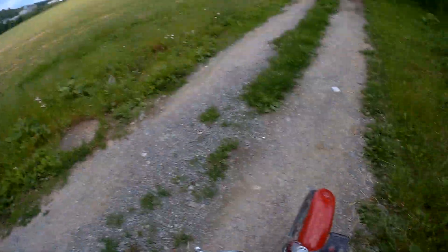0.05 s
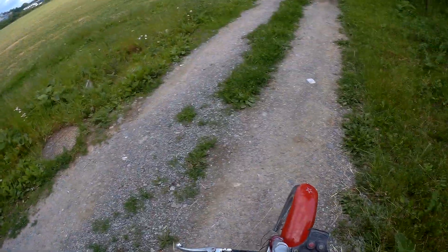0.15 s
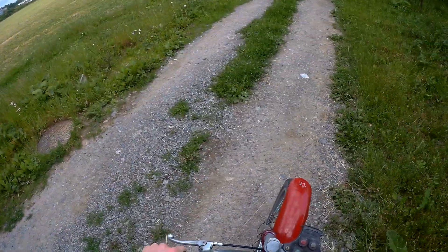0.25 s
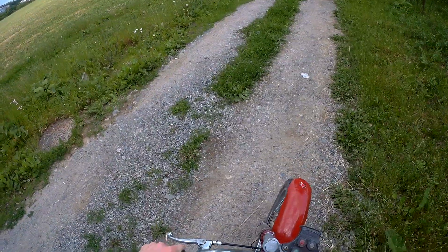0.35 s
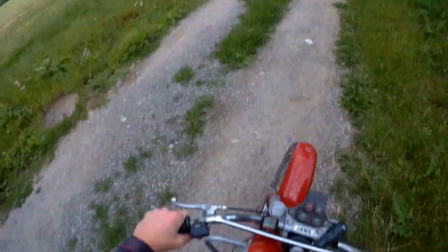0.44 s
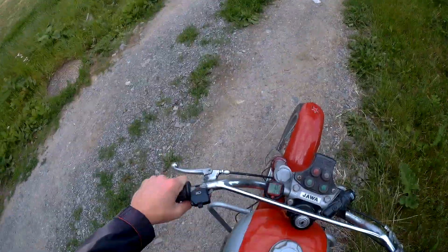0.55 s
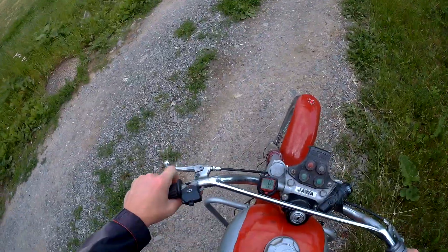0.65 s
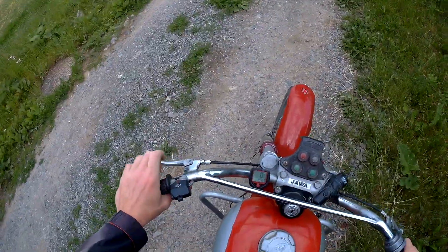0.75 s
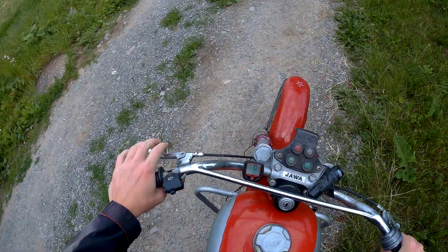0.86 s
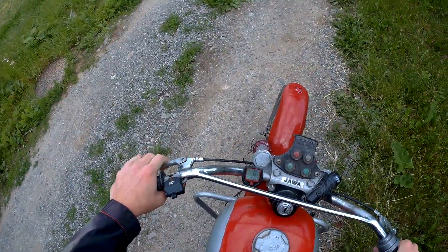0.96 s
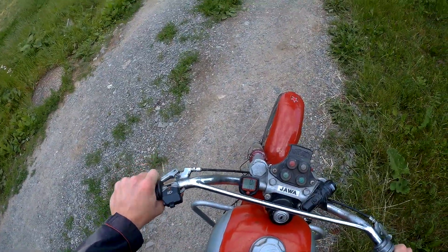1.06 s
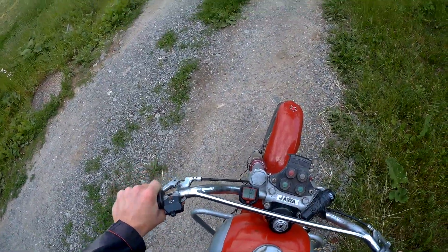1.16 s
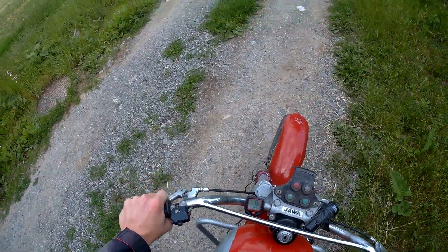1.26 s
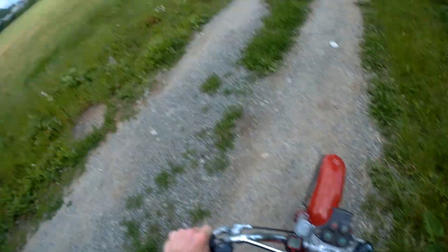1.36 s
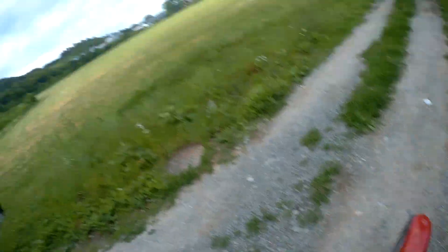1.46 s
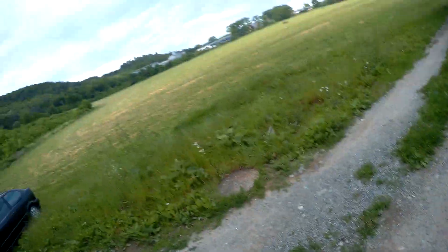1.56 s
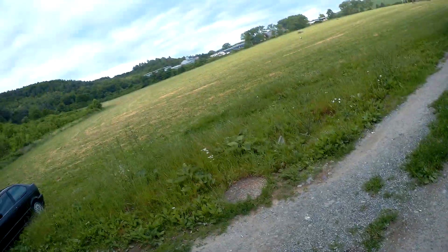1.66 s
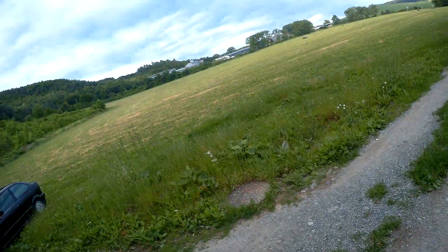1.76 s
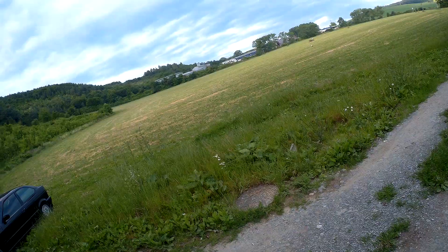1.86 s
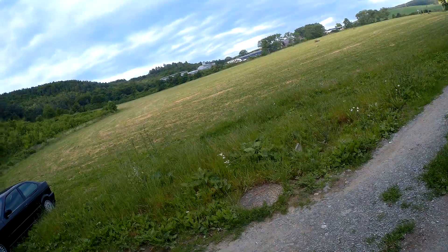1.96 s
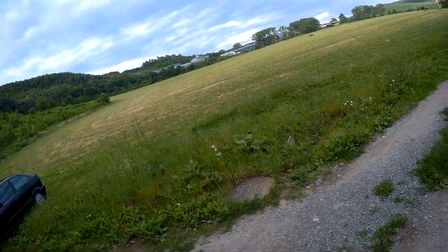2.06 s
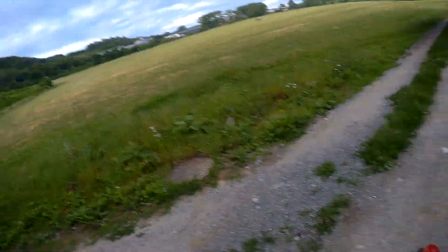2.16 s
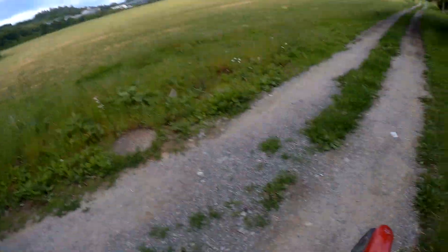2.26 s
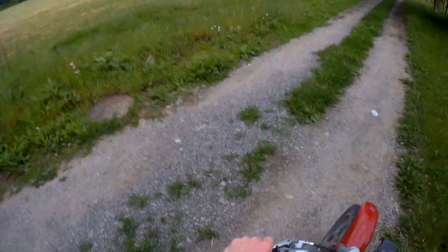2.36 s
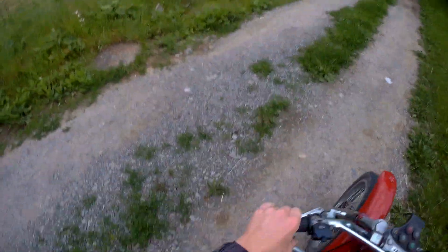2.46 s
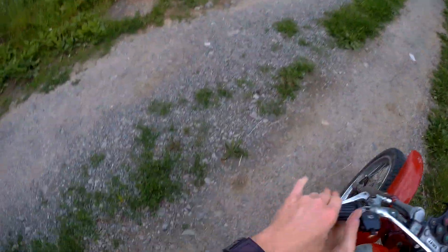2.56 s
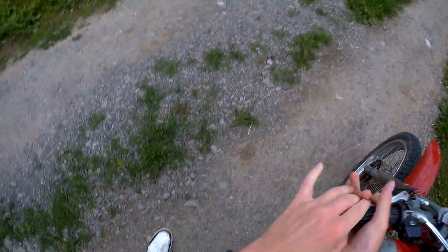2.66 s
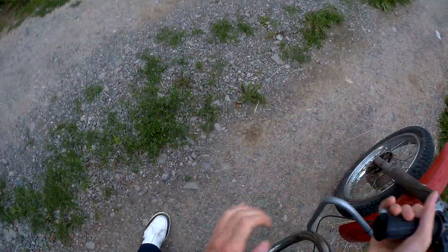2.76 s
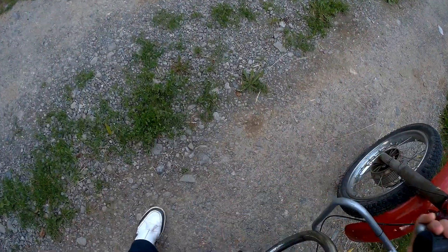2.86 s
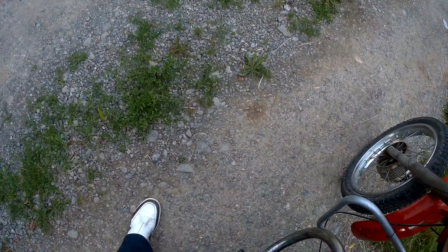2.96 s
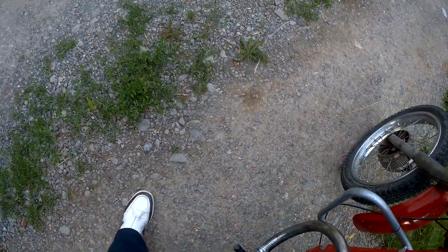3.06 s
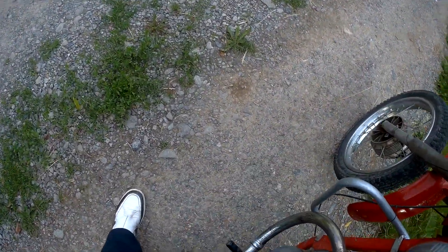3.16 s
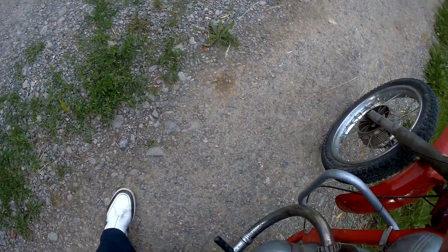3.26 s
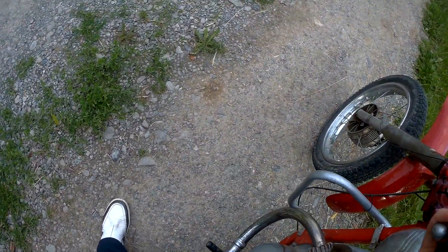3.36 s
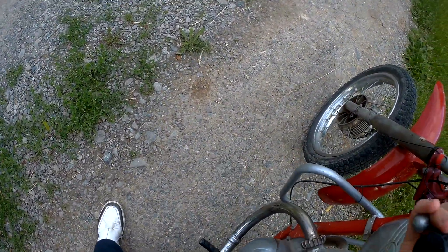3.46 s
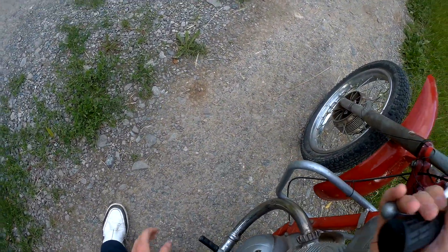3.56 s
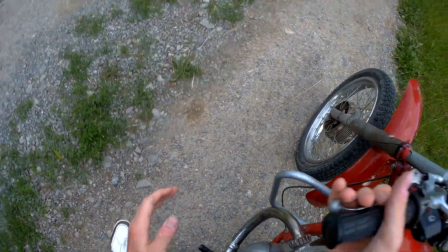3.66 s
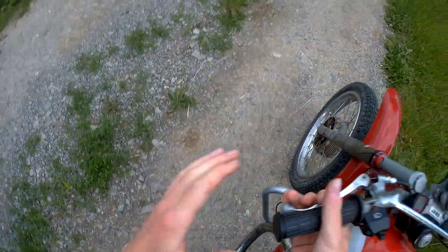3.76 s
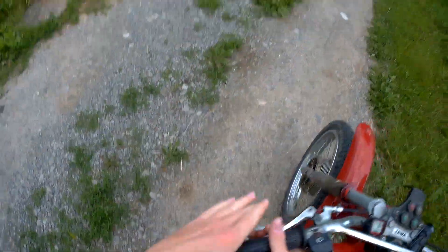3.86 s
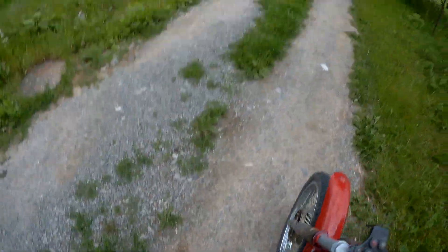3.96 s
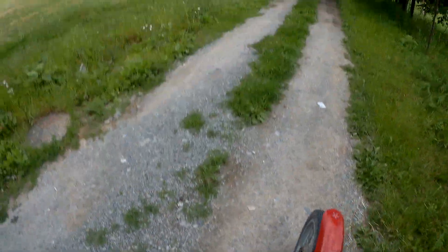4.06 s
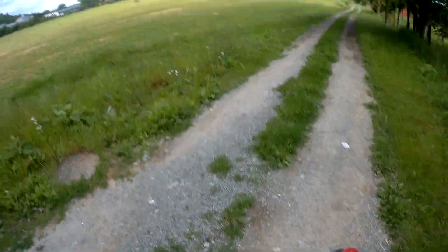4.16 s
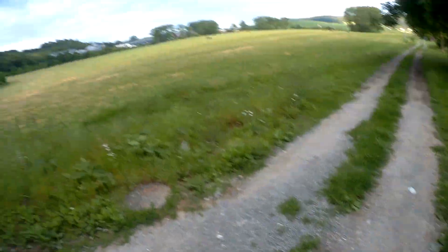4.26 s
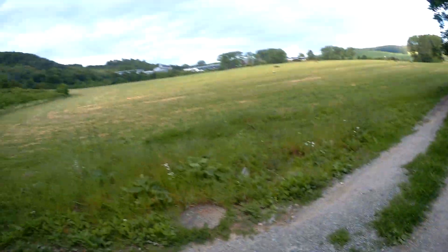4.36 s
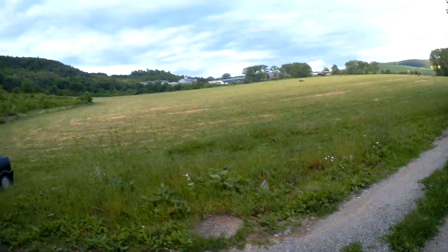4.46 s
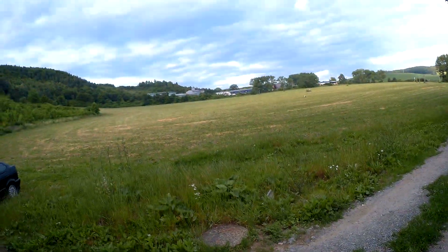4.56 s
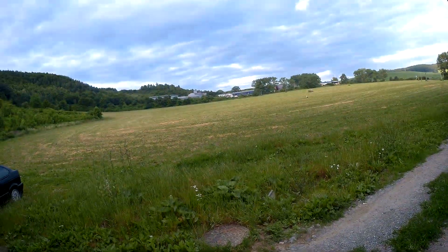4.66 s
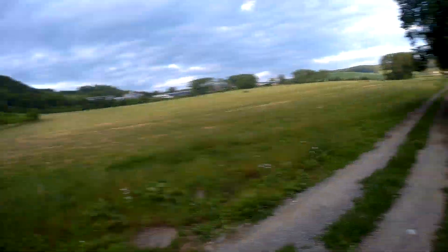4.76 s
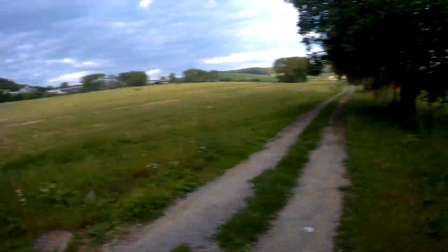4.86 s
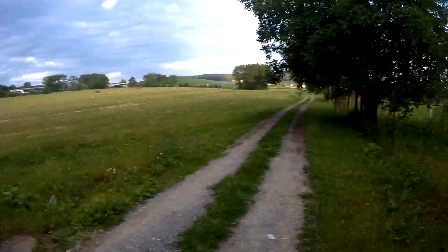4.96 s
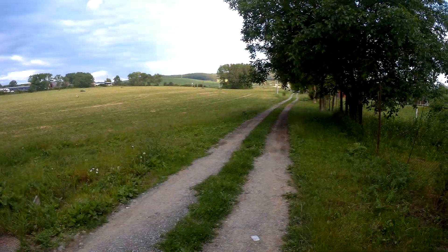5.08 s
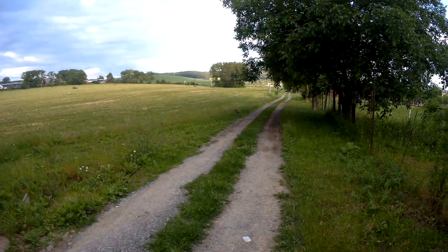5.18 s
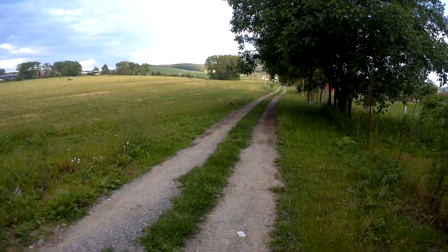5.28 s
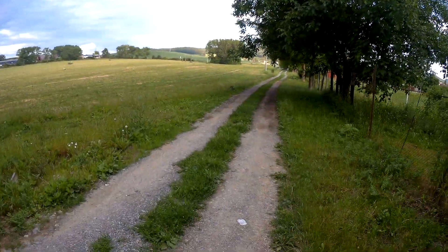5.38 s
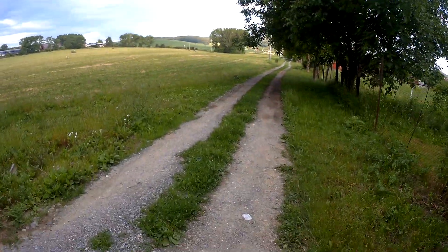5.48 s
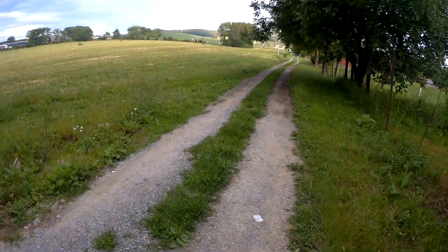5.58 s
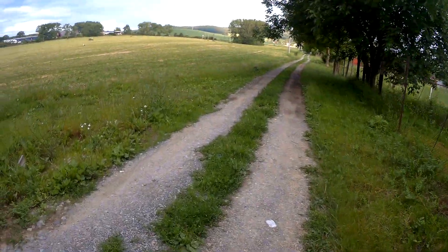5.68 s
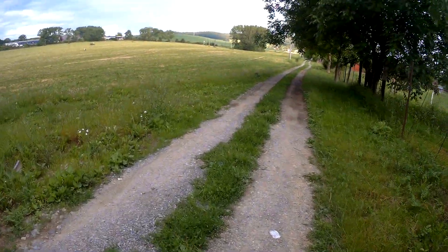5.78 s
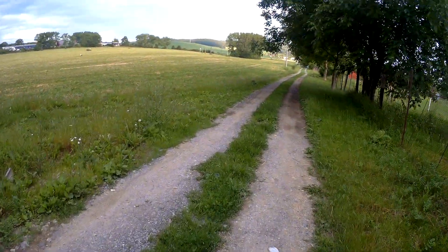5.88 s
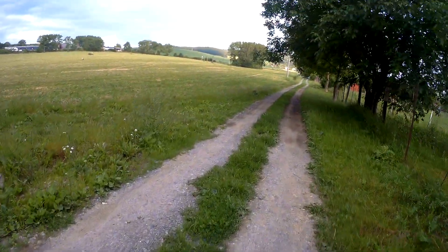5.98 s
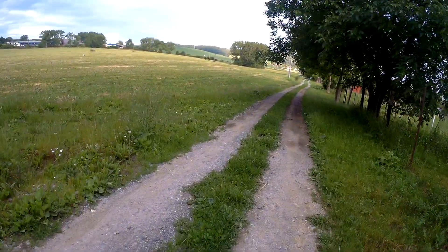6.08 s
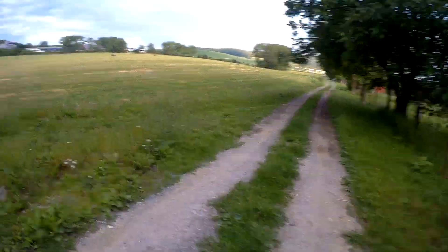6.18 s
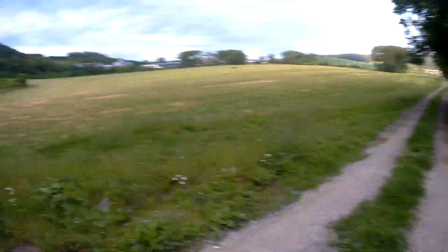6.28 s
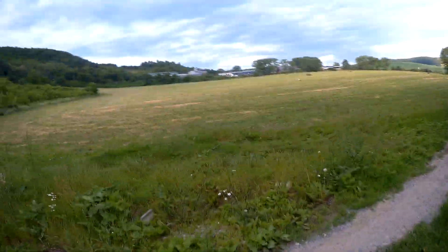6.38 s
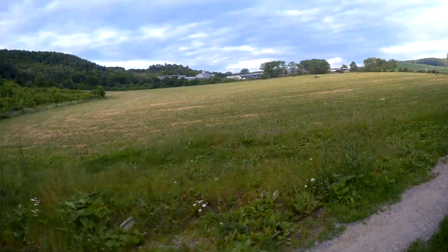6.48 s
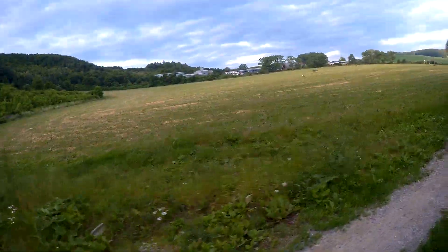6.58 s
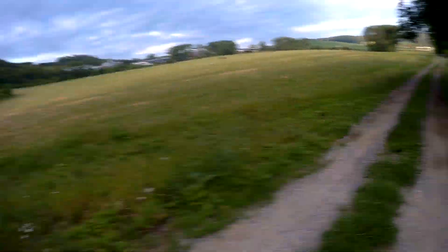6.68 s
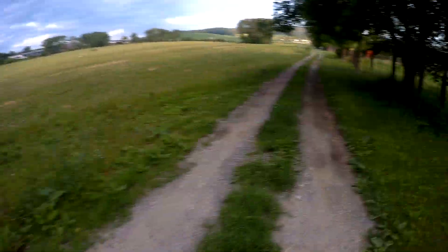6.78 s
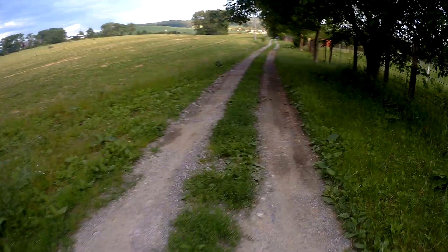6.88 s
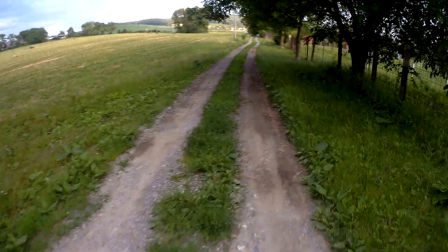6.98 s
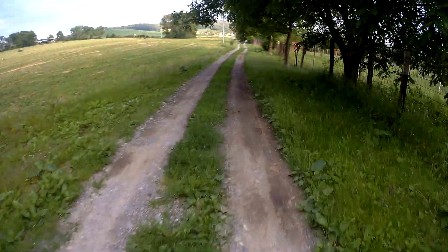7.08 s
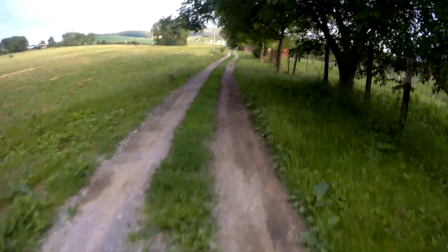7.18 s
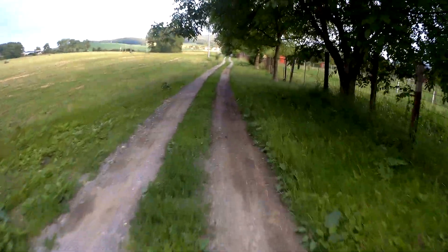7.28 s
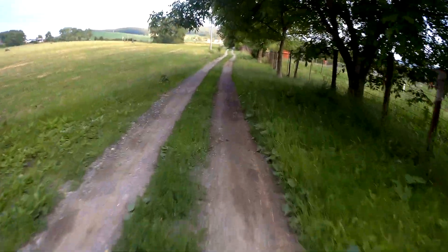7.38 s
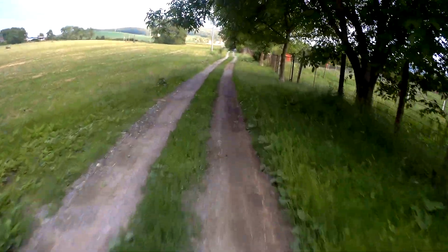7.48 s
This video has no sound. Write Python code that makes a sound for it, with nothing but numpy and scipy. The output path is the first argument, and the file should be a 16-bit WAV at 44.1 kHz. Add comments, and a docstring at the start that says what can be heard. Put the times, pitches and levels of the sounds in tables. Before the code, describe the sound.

Outdoors and very close, with the microphone at a rider's head. A single-cylinder two-stroke starts low and quiet at 0 s, with small pops, then is blipped from about 0.35 to 1 s: ragged intake gulps, case clanks and quickly rising revs. From 1 to 4.7 s it coasts with loose metallic clatter, gradually slowing but nudged up by lone firings, each a dry crack with ringing metal and a silencer thud, near 1.3, 1.55 (a quick cluster), 2.0, 2.4, 2.8, 3.2, 3.6, 3.95 and 4.3 s. Between 2.9 and 3.9 s the ticking is closer and brighter. At 4.75 s intake gasps burst out and the engine pulls away, climbing to a hard, ringing buzz by 5.5 s, firing unevenly, easing around 6 to 6.8 s, smoother and duller, then rising again, loud and harsh, to 7.5 s. Low gusty wind, handling rumble, soft bumps (strongest near 6.4 s) and steady hiss underneath.

```python
"""A single-cylinder two-stroke motorcycle engine, heard from the rider's head: blipped, coasting, pulling away.
One crank speed drives it all: pipe tones are crank orders, intake gulps and contacts are shaped noise and clicks.
Coasting, lone firings crack, thud and kick the crank; resonances ring as crankcase, fins and exhaust header.
Behind it lie gusty wind, handling rumble, soft bumps and hiss at the microphone."""
import sys
import numpy as np
from scipy import signal
from scipy.fft import rfft, irfft
from scipy.io import wavfile
from scipy.ndimage import uniform_filter1d

SR = 44100
rng = np.random.default_rng(int(sys.argv[2]) if len(sys.argv) > 2 else 0)


def persist_wave(psi):
    """Save psi, clipped to +-1, as 16-bit WAV."""
    counts = np.round(np.clip(psi, -1, 1) * 32767).astype(np.int16)
    wavfile.write(sys.argv[1], SR, np.atleast_2d(counts).T)


N = 332073
TIME_S = np.arange(N) / SR

# crank speed while blipped: time_s, speed_turns_per_s
BLIP_SPEED = [(0, 14.3), (.44, 16.7), (.49, 23.5), (.58, 24.3), (.63, 31), (.75, 30), (.83, 34), (.92, 47),
              (1.03, 44.5)]
# crank speed while pulling away: time_s, speed_turns_per_s
PULL_SPEED = [(4.78, 31.8), (4.95, 41.9), (5.09, 46.3), (5.25, 51.6), (5.49, 56.3), (5.64, 56.2),
              (5.75, 55.7), (5.88, 51.3), (6.04, 47), (6.23, 46.4), (6.44, 44.5), (6.64, 44.5),
              (6.87, 45.1), (6.98, 46.8), (7.13, 48.2), (7.18, 48.2), (7.47, 53.7), (7.53, 55.4)]
# lone firings, source levels ahead of the bodies: start_s, crack_db, thud_db, case_db, kick_turns_per_s
FIRINGS = [(0.114, -34, -43, -29, 0), (0.2, -38, -30, -19, 0), (0.474, -27, -39, -17, 0),
           (0.604, -25.5, -31, -19, 0), (0.672, -26, -30, -14, 0), (0.762, -26, -31, -20, 0),
           (0.875, -23.5, -29, -26, 0), (0.961, -22.5, -36, -23, 0), (1.275, -22, -23, -21, 1.9),
           (1.53, -24.5, -38, -21, 0), (1.551, -26.5, -40, -14, 0.61), (1.5702, -28, -31, -18, 0.65),
           (1.595, -37, -27, -15, 0.66), (1.612, -30, -31, -25, 0), (2.016, -24.5, -25.5, -27, 2.5),
           (2.423, -23.5, -26.5, -35, 2.5), (2.503, -48, -27, -28, 0), (2.829, -20, -25.5, -21, 3.5),
           (3.2211, -17, -28, -22, 4), (3.5905, -17.5, -24, -23, 2), (3.953, -23, -27, -23, 3.5),
           (4.3297, -27.5, -25, -25.5, 4.5), (4.7102, -29.5, -29, -26, 0)]
DRAG_TURNS_PER_S2, KICK_S, KICK_LEAD_S = 11.92, .092, .024


def crank_speed():
    """Turns per second: throttle leads blip and pull; between them steady drag slows, lone firings kick up."""
    shut_s, shut_speed = BLIP_SPEED[-1]
    open_s = FIRINGS[-1][0]  # last lone firing comes as the throttle opens
    kicks = 0
    for start_s, *_, kick in FIRINGS:
        kicks = kicks + kick * np.clip((TIME_S - start_s + KICK_LEAD_S) / KICK_S, 0, 1)
    coasting = shut_speed - DRAG_TURNS_PER_S2 * (TIME_S - shut_s) + kicks
    joint = [(open_s, np.interp(open_s, TIME_S, coasting))]
    driven, = in_time(BLIP_SPEED + joint + PULL_SPEED)
    return np.where((TIME_S > shut_s) & (TIME_S < open_s), coasting, driven)


# four-stroking, only every second turn fires: time_s, share_0_to_1
SKIPPING = [(5.85, 1), (6.08, 0)]
# pipe tones, throttle shut, at idle clatter and no load: order_per_turn, low_revs_db, high_revs_db
COAST_ORDERS = [(3, -62, -53), (4, -54.5, -53.5), (5, -55.5, -46.5), (6, -56, -46), (7, -46.5, -55),
                (8, -46, -55), (9, -52.5, -70), (10, -59, -56.5)]
# pipe tones at full load: order_per_turn, even_low_revs_db, even_high_revs_db,
# four_stroking_low_revs_db, four_stroking_high_revs_db
PULL_ORDERS = [(2, -46.5, -49, -47, -54), (2.5, -58, -49, -44.5, -44), (3, -44, -43, -49, -55),
               (3.5, -55, -54, -44.5, -45), (4, -44, -38, -52, -37), (4.5, -47, -36, -41, -39.5),
               (5, -36.5, -25.5, -37, -28.5), (6, -37.5, -27.5, -39, -50), (7, -34.5, -45, -33, -34),
               (8, -38.5, -33, -41, -41), (9, -41, -47, -42, -34), (10, -43.5, -52, -42.5, -48),
               (12, -48, -46, -47, -47)]
# low-to-high crossover, turns per s
COAST_REVS, PULL_REVS = (34.7, 38.5), (46, 53)
COAST_PIPE_FOLLOWS = 0.58  # share of the clatter swing


def pipe(speed, turns, load, swing_db):
    """Clean pumping tones whose balance shifts with revs, with half orders when firings are skipped."""
    skipping = share(SKIPPING)
    fast, high = revs(speed, COAST_REVS), revs(speed, PULL_REVS)
    coasting = 0
    for order, low_db, high_db in COAST_ORDERS:
        level_db = low_db + fast * (high_db - low_db)
        coasting = coasting + from_db(level_db) * tone(turns, round(order))
    pulling = 0
    for order, even_low, even_high, skip_low, skip_high in PULL_ORDERS:
        even_db = even_low + high * (even_high - even_low)
        skip_db = skip_low + high * (skip_high - skip_low)
        level_db = even_db + skipping * (skip_db - even_db)
        pulling = pulling + from_db(level_db) * tone(turns, round(2 * order) / 2)
    return (1 - load) * from_db(COAST_PIPE_FOLLOWS * swing_db) * coasting + load ** 2 * pulling


# air box spectrum: frequency_hz, relative_db
INTAKE_SPECTRUM = [(60, -24), (160, -12.5), (230, -5), (280, 5), (370, 0), (500, -5.5), (600, -21),
                   (1000, -18), (3000, -65)]
GAS_DB, GAS_FOLLOWS = -40.5, 0.8  # gain at idle clatter, share of its swing followed


def intake(turns, load, snap, swing_db):
    """Air rushes as the port opens and again as it shuts."""
    opening = beats(turns, angle=.1, decay=.12, spread_db=2)
    shutting = beats(turns, angle=.48, decay=.14, spread_db=2)
    rush = (.2 + opening + shutting) * noise()
    strength = from_db(-27.0) + from_db(-14.0) * load + from_db(7.5) * snap
    return from_db(GAS_DB + GAS_FOLLOWS * swing_db) * strength * levelled(through(rush, INTAKE_SPECTRUM))


# intake gulps as the throttle snaps open, source levels: start_s, pulse_db, case_db
GULPS = [(.334, -28, -20), (.354, -20, -22), (.391, -24, -23), (.413, -21, -17), (0.4726, -17, -13),
         (.483, -22, -19), (0.4991, -25, -16), (0.504, -32, -20), (0.5141, -17.5, -16), (.5416, -23, -16),
         (0.548, -32, -16), (0.5569, -17.5, -20), (.585, -23, -17), (0.5923, -32, -18.5),
         (0.6002, -16, -21), (.6127, -24, -26), (.622, -21, -16), (0.6269, -32, -18), (0.636, -20, -15),
         (.658, -26, -20), (0.6644, -28, -16), (.682, -25, -16.5), (.778, -25, -18), (0.804, -22, -19),
         (0.814, -19, -14), (0.835, -19, -13.5), (.842, -19, -18), (0.8622, -18, -12), (0.8709, -13, -17),
         (.888, -18, -15), (.898, -19, -13), (.914, -18, -15), (.922, -24, -14), (.938, -23, -10),
         (.9457, -31, -14), (.960, -33, -13), (4.7567, -21, -29), (4.7684, -19, -25), (4.8004, -12, -21),
         (4.820, -20, -25), (4.830, -15.5, -15), (4.8485, -19, -28), (4.859, -15, -21)]
# crankcase spectrum: frequency_hz, relative_db
CASE_SPECTRUM = [(500, -28.5), (950, -10), (1130, -2), (1220, -3), (1300, 4), (1370, -2), (1450, -4),
                 (1540, -13), (1660, -16), (1780, -33), (2080, -26.5), (2350, -39), (5000, -58.5)]


def gulps():
    """Each gulp is one pressure pulse that booms in the air box and clanks the case, which rattles briefly."""
    start_s, pulse_db, case_db = np.transpose(GULPS)
    boom = from_db(0.5) * through(bursts(start_s, pulse_db, decay_s=0.00018), INTAKE_SPECTRUM)
    clank = from_db(11.5) * bursts(start_s, case_db, decay_s=0.00002)
    rattle = from_db(-11.0) * bursts(start_s, case_db, decay_s=0.005) * noise()
    return boom + through(clank + rattle, CASE_SPECTRUM)


# broad crack of a firing: frequency_hz, relative_db
CRACK_SPECTRUM = [(600, -37), (1500, 4.5), (2800, 7), (4000, 8), (6000, -0.5), (8000, -4), (9500, -8.5),
                  (15000, -32)]
# cylinder ring after a firing: centre_hz, width_hz, relative_db
CRACK_MODES = [(2090, 46, 0.5), (2590, 67, -0.5), (3060, 61, -2), (3870, 130, -1.5), (4390, 44, -3.5),
               (5500, 68, -3.5), (6090, 84, -2.5), (7990, 160, -6)]
# silencer thud: frequency_hz, relative_db
THUD_SPECTRUM = [(30, -34), (90, -6.5), (130, -4), (260, 1), (340, -11.5), (550, -8), (1200, -42.5)]


def firings():
    """A lone firing cracks in the cylinder, rings the case and thuds out of the silencer."""
    start_s, crack_db, thud_db, case_db, _ = np.transpose(FIRINGS)
    pressure = bursts(start_s, crack_db, decay_s=0.0027) + 0.13 * bursts(start_s, crack_db, decay_s=0.076)
    smoothed = np.convolve(pressure, np.ones(140) / 140)[:N]  # onset rounded over 3 ms
    blow = smoothed * noise()
    crack = from_db(-2.5) * through(blow, CRACK_SPECTRUM) + from_db(10.5) * ringing(blow, CRACK_MODES)
    thud_blow = bursts(start_s, thud_db, decay_s=0.019) * noise()
    case_blow = bursts(start_s, case_db, decay_s=0.013) * noise()
    thud = from_db(-2.5) * through(thud_blow, THUD_SPECTRUM)
    case = from_db(-5.5) * through(case_blow, CASE_SPECTRUM)
    return crack + thud + case


# header ring level: time_s, level_db
DING_LEVEL = [(4.7, -77), (4.8, -46), (5.15, -41), (5.4, -45.5), (5.8, -40), (6.15, -46.5), (6.4, -51),
              (6.7, -62), (6.82, -44), (7.46, -44)]
# header ring, four-stroking: centre_hz, width_hz, relative_db
DING_MODES = [(3084, 69, 9.5), (3370, 90, -6), (3730, 40, -5), (4400, 130, -8), (6670, 54, -8),
              (7500, 198, -15)]
# modes joining at high revs, four-stroking: centre_hz, width_hz, relative_db
HOT_MODES = [(3695, 45, 8)]
# header ring once firing is even: centre_hz, width_hz, relative_db
EVEN_MODES = [(3130, 80, 0), (3350, 70, 4), (3660, 79, -2)]
# hard firing slips to the other turn of each pair: time_s
SLIPS = [5.36, 5.84, 6.17, 6.7, 6.951]
SLAP_S = 6.5143  # one piston slap under load
DING_TURNS = .58  # header ring lags the slap


def ding(speed, turns):
    """Every second turn fires hard and rings the exhaust header, higher at high revs while four-stroking."""
    turns = since(turns, SLAP_S) - DING_TURNS
    skipping, high = share(SKIPPING), revs(speed, PULL_REVS)
    slips = np.searchsorted(np.sort(SLIPS), TIME_S)
    fires = (np.floor(turns) + slips + 1) % 2
    burst = beats(turns, angle=0, decay=0.17, spread_db=0.5) * noise()
    blast = fires * (burst + 22 * strokes(turns, angle=0, spread_db=1))
    uneven = (1 - 0.51 * high) * ringing(blast, DING_MODES) + high * ringing(blast, HOT_MODES)
    even = ringing(blast, EVEN_MODES)
    return from_db(in_time(DING_LEVEL)[0]) * levelled(skipping * uneven + (1 - skipping) * even)


# clatter control: time_s, control_db
CLATTER = [(0, -48), (.15, -46), (.2, -32), (.45, -34), (.56, -37.5), (.7, -31), (.82, -33), (.92, -23),
           (1.1, -31.5), (1.65, -33), (1.8, -34.5), (2.6, -37.5), (3.15, -29.5), (3.7, -32), (4.2, -39),
           (4.68, -37.5), (4.93, -26.5), (5.2, -26), (5.6, -18), (6.05, -23.5), (6.5, -22.5), (7.1, -22.5),
           (7.4, -15), (7.53, -17)]
CLATTER_IDLE_DB = -35


def clatter_swing():
    """Clatter strength in dB above idle, shared by case, block, gas flow and rumble."""
    return in_time(CLATTER)[0] - CLATTER_IDLE_DB


# hard knocks, gain added to a base of 1.5: start_s, added_db
KNOCKS = [(4.909, 8), (5.536, 12), (6.125, -2), (6.233, 0), (6.445, 1), (6.512, -9), (6.672, 1), (7.071, 1),
          (7.249, -10), (7.310, -6), (7.393, 11)]
# contacts per turn, coasting: angle_turns, click_force, spread_db, rattle_force, rattle_decay_turns
COAST_CONTACTS = [(0, 11.2, 2, 1.22, 0.42), (.31, 6.8, 3.5, 0.47, 0.41), (.55, 7.4, 3, 0.55, 0.66)]
# contacts per turn, pulling: angle_turns, click_force, spread_db, rattle_force, rattle_decay_turns
PULL_CONTACTS = [(0, 21, 1.2, 1.38, 0.2), (.33, 9.5, 3.8, 0.51, 0.34), (.62, 6, 4, .5, .16)]
TICK_S = 3.05  # one piston tick while coasting


def knocks(turns, load):
    """Loose clatter coasting, one hard piston slap a turn under load; now and then a blow lands harder."""
    start_s, added_db = np.transpose(KNOCKS)
    coasting = clatter(since(turns, TICK_S), COAST_CONTACTS, churn=0.41)
    pulling = clatter(since(turns, SLAP_S), PULL_CONTACTS, churn=0.56)
    force = 1.5 + bursts(start_s, added_db, decay_s=0.003)
    return force * ((1 - load) * coasting + load * pulling)


def clatter(turns, contacts, churn):
    """Each piston or gear contact is a click with a short rattle after it, over the churn of the gears."""
    clicks = sum(force * strokes(turns, angle, spread) for angle, force, spread, _, _ in contacts)
    rattle = sum(size * beats(turns, angle, decay, spread) for angle, _, spread, size, decay in contacts)
    return clicks + (churn + rattle) * noise()


# head bent down beside the cylinder: time_s, share_0_to_1
LEAN = [(0, 0.2), (1.4, 0.44), (1.7, 0.2), (2.5, 0.34), (2.95, 1), (3.8, 0.92), (4.3, 0.24), (7.53, 0.01)]
# crankcase panel heard when leaning over: centre_hz, width_hz, relative_db
CASE_NEAR_MODES = [(1462, 39, 2)]
CASE_DB = -34.5  # at idle clatter


def crankcase(blows, load, swing_db):
    """Knocks ring the case; one panel stands out from close by."""
    body = through(blows, CASE_SPECTRUM)
    panel = share(LEAN) * (1 - load) * ringing(body, CASE_NEAR_MODES)
    return from_db(CASE_DB + swing_db) * levelled(body + panel)


# engine block spectrum: frequency_hz, relative_db
BLOCK_SPECTRUM = [(100, -29), (270, -10), (400, -8.5), (510, -3.5), (580, -3.5), (640, 0), (720, -2),
                  (850, 1.5), (950, -2), (1040, 7), (1250, -24), (1700, -15.5), (4000, -50.5)]
BLOCK_DB, BLOCK_FOLLOWS = -39, 0.51  # level at idle clatter, share of its swing followed


def engine_block(blows, swing_db):
    """The same knocks ring the block, lower than the case."""
    return from_db(BLOCK_DB + BLOCK_FOLLOWS * swing_db) * levelled(through(blows, BLOCK_SPECTRUM))


# fin gain ahead of the load and head balance: time_s, gain_db
FIN_LEVEL = [(0, -71), (.2, -44), (.55, -43.5), (.98, -36), (1.84, -41.5), (2.8, -41.5), (3.05, -36.5),
             (3.55, -36), (4.2, -46), (4.74, -47), (5.1, -38.5), (5.8, -34.5), (6.1, -36.5), (6.95, -37.5),
             (7.53, -34)]
# head turned aside: time_s, share_0_to_1
ASIDE = [(1.5, 0.1), (1.68, 0.6), (2.05, 0.6), (2.25, 0.4), (2.6, 0.8), (2.8, 0), (6.0, 0.04), (6.35, 0.6),
         (6.48, 0.86), (6.68, 0.96), (6.8, 0)]
# fin modes from close by, per blow: centre_hz, width_hz, relative_db
CHURN_MODES = [(1920, 160, -8.5), (2680, 40, 7), (3080, 360, -15), (3980, 166, 5), (4760, 710, -14)]
SCRAPE_MODES = [(5200, 230, -2.5), (5870, 62, 2.5), (6300, 60, -2.5), (6800, 49, -2)]
TICK_MODES = [(7610, 230, -2.5), (8220, 140, -3)]
# fin modes from farther off: centre_hz, width_hz, relative_db
FAR_MODES = [(2073, 39, 7), (2750, 170, 4), (4210, 85, -3.5), (5090, 46, -1), (6080, 220, -4.5),
             (6970, 82, -9), (7900, 190, -15)]
# fin modes with the head aside: centre_hz, width_hz, relative_db
ASIDE_MODES = [(6130, 160, -9), (7120, 35, 4)]
# fin spectra: frequency_hz, relative_db
COASTING_SPECTRUM = [(1060, -25), (1800, -12), (2080, -4), (2490, -22), (2750, 4), (3200, -2),
                     (4020, -12.5), (4820, -2), (6000, -10), (6720, -18), (7310, -7), (8630, -11),
                     (11000, -31), (14300, -56), (22000, -120)]
LOADED_SPECTRUM = [(1060, -12.5), (1800, -3), (2090, -2), (2430, -8.5), (3290, -2), (3770, -6), (4700, -11),
                   (5130, -9.5), (5560, -17), (6210, -9.5), (6720, -15), (7690, -10), (9690, -27.5),
                   (10400, -25), (12000, -51), (15600, -51), (22000, -120)]


def fins(turns, load):
    """Cooling fins sing with each turn: low modes steadily, high ones as a scrape and a tick."""
    lean, aside = share(LEAN), share(ASIDE)
    stroke = since(turns, TICK_S)
    churn = (0.5 + beats(stroke, angle=0, decay=0.56, spread_db=4.5)) * noise()
    scrape = (0.79 + beats(stroke, angle=-0.16, decay=0.34, spread_db=6.5)) * noise()
    tick = (.22 + beats(stroke, angle=0, decay=.14, spread_db=1.5)) * noise()
    rasp = (1.0 + beats(turns, angle=0.05, decay=0.6, spread_db=4.0)) * noise()

    near = ringing(levelled(churn), CHURN_MODES)
    near = near + ringing(levelled(scrape), SCRAPE_MODES)
    near = near + ringing(levelled(tick), TICK_MODES)
    far = levelled(ringing(scrape, FAR_MODES))
    coasting = (1 - lean) * far + from_db(3.0) * lean * levelled(near)
    coasting = coasting + from_db(-5.5) * levelled(through(churn, COASTING_SPECTRUM))
    pulling = from_db(.5 - 5.0 * aside) * levelled(through(rasp, LOADED_SPECTRUM))
    pulling = pulling + from_db(-5.0) * aside * far
    sideways = from_db(-13.0) * aside * levelled(ringing(scrape, ASIDE_MODES))

    balance = from_db(-3.5) * np.sqrt(1 - load) * coasting + from_db(1.0) * np.sqrt(load) * pulling
    return from_db(in_time(FIN_LEVEL)[0]) * (balance + sideways)


# wind at the microphone ahead of gusts: time_s, level_db
WIND_LEVEL = [(.07, -32.5), (.15, -46), (.6, -40.5), (1.0, -52), (1.6, -42), (2.6, -48.5), (5.3, -49),
              (7.3, -43)]
# wind spectrum: frequency_hz, relative_db
WIND_SPECTRUM = [(5, -14), (14, 8), (28, -16), (60, -13.5), (150, -36), (600, -55)]


def wind():
    """Low noise at the microphone, swelling with gusts."""
    return from_db(in_time(WIND_LEVEL)[0] + gusts()) * levelled(through(noise(), WIND_SPECTRUM))


GUST_DB, GUSTS_PER_S = 4, 8.7  # spread before clipping, random steps per s


def gusts():
    """Slow random swell in dB, new at each call."""
    steps = np.clip(rng.standard_normal(512), -1.5, 1.5)
    return GUST_DB * np.interp(TIME_S * GUSTS_PER_S, np.arange(len(steps)), steps)


# soft bumps of the microphone mount: centre_s, peak_db
BUMPS = [(1.45, -39.5), (1.56, -37), (2.2, -40), (3.005, -41), (4.4, -38), (4.6, -44), (6.395, -29.5),
         (6.62, -44)]
# mount boom: centre_hz, width_hz, relative_db
MOUNT_MODES = [(121, 55, 0)]
BUMP_WIDTH_S = 0.045


def mount_bumps():
    """Bell-shaped swells of noise rung twice through the mount's resonance."""
    swell = sum(from_db(db) * np.exp(-((TIME_S - s) / BUMP_WIDTH_S) ** 2) for s, db in BUMPS)
    return swell * levelled(ringing(ringing(noise(), MOUNT_MODES), MOUNT_MODES))


# rumble spectrum: frequency_hz, relative_db
RUMBLE_SPECTRUM = [(30, -6.5), (70, -8), (120, -1.5), (160, -7), (240, -8), (800, -46), (4000, -83)]
RUMBLE_DB, RUMBLE_FOLLOWS = -47, 0.35  # level at idle clatter ahead of gusts, share of its swing followed


def rumble(swing_db):
    """Handling rumble: low noise growing with the clatter as the machine shakes."""
    level_db = RUMBLE_DB + RUMBLE_FOLLOWS * swing_db + gusts()
    return from_db(level_db) * levelled(through(noise(), RUMBLE_SPECTRUM))


# hiss spectrum: frequency_hz, relative_db
HISS_SPECTRUM = [(100, 13.5), (2000, 3.5), (8000, -7.5), (11000, -4.5), (14000, -6), (16000, -14)]


def hiss():
    """Steady shaped noise at the microphone."""
    return from_db(-47.0) * through(noise(), HISS_SPECTRUM)


def from_db(db):
    """Decibels to gain."""
    return np.exp(np.asarray(db) * (np.log(10) / 20))


def in_time(rows):
    """Each column of a curve at every sample."""
    time_s, *columns = np.transpose(rows)
    return [np.interp(TIME_S, time_s, column) for column in columns]


def share(rows):
    """A control kept between 0 and 1."""
    return np.clip(in_time(rows)[0], 0, 1)


def revs(speed, span):
    """0 at low revs, 1 at high revs."""
    return np.clip((speed - span[0]) / (span[1] - span[0]), 0, 1)


def since(turns, moment_s):
    """Crank turns counted from a moment."""
    return turns - np.interp(moment_s, TIME_S, turns)


def noise():
    """White noise of rms 1."""
    return rng.standard_normal(N)


def levelled(x):
    """Rms 1 over a few crank turns; single beats stay."""
    power = uniform_filter1d(uniform_filter1d(x * x, size=4400), size=4400)
    return x / np.sqrt(np.abs(power) + 1e-12)


def at_hz(points, hz):
    """A spectrum read on a log-frequency axis."""
    point_hz, level_db = np.transpose(points)
    return np.interp(np.log(hz + 1e-3), np.log(point_hz), level_db)


def through(x, spectrum, size=16384):
    """Causal (minimum-phase) body with this spectrum; white noise keeps its power."""
    gain = from_db(at_hz(spectrum, np.arange(size // 2 + 1) * SR / size))
    cepstrum = irfft(np.log(gain / np.sqrt(np.mean(gain ** 2))))
    cepstrum[1:size // 2] *= 2  # fold to minimum phase
    cepstrum[size // 2 + 1:] = 0
    response = irfft(np.exp(rfft(cepstrum)))[:size // 2]
    return signal.oaconvolve(x, response)[:N]


def ringing(x, modes):
    """Parallel two-pole resonances of alternating sign."""
    out = 0
    for k, (hz, width_hz, db) in enumerate(modes):
        r = np.exp(-np.pi * width_hz / SR)
        poles = [1, -2 * r * np.cos(2 * np.pi * hz / SR), r * r]
        gain = (-1) ** k * from_db(db) * (1 - r * r) / 2
        out = out + gain * signal.lfilter([1, 0, -1], poles, x)
    return out


def beats(turns, angle, decay, spread_db):
    """Envelope of a blow at one crank angle, dying over part of a turn, new in strength each turn."""
    turn, elapsed = np.divmod(turns - angle + 2, 1)
    strength = from_db(spread_db * rng.standard_normal(512))
    return strength[turn.astype(int)] * np.exp(-elapsed / decay)


def strokes(turns, angle, spread_db):
    """One click each turn at this crank angle, new in strength each time."""
    turn = np.floor(turns - angle)
    strength = from_db(spread_db * np.clip(noise(), -1.7, 1.7))
    return np.diff(turn, prepend=turn[0]) * strength


def bursts(start_s, levels_db, decay_s):
    """Envelope of sudden blows that die away exponentially."""
    hits = np.zeros(N)
    hits[(start_s * SR).astype(int)] = from_db(levels_db)
    return signal.lfilter([1], [1, -np.exp(-1 / (decay_s * SR))], hits + 1e-18)


def tone(turns, order):
    """One crank order, roughly in step with the others, so they add up to a smeared puff each turn."""
    return np.sqrt(2) * np.cos(2 * np.pi * (order * turns + 0.19 * rng.standard_normal()))


# engine pull: time_s, load_0_to_1
LOAD = [(0, 0.23), (.7, 0.05), (.9, 0.17), (1.05, 0.04), (4.7, 0.08), (5.0, 0.96), (5.3, 1), (7.53, 1)]
# throttle snapped open at low speed, intake gasps: time_s, share_0_to_1
SNAP = [(.25, 0.22), (.6, 0.24), (.92, 0.42), (1.0, 0), (4.7, 0.07), (4.77, 0.76), (4.88, 0.75),
        (4.98, 0.1)]


def scene():
    """The engine, driven by its crank, with wind, rumble and hiss at the microphone."""
    speed = crank_speed()
    turns = np.cumsum(speed) / SR
    load, snap, swing_db = share(LOAD), share(SNAP), clatter_swing()
    blows = knocks(turns, load)
    gas = (1 - snap) * pipe(speed, turns, load, swing_db) + intake(turns, load, snap, swing_db)
    events = gulps() + firings()
    metal = ding(speed, turns) + crankcase(blows, load, swing_db)
    metal = metal + engine_block(blows, swing_db) + fins(turns, load)
    air = wind() + mount_bumps() + rumble(swing_db) + hiss()
    return (gas + events + metal + air)[None]


CUTOFF_HZ = 15600


def record(dry):
    """The top is cut steeply by an elliptic low-pass."""
    lowpass = signal.ellip(12, .1, 90, CUTOFF_HZ, fs=SR, output="sos")
    return signal.sosfilt(lowpass, dry)


dry = scene()
out = record(dry)
persist_wave(out)
```